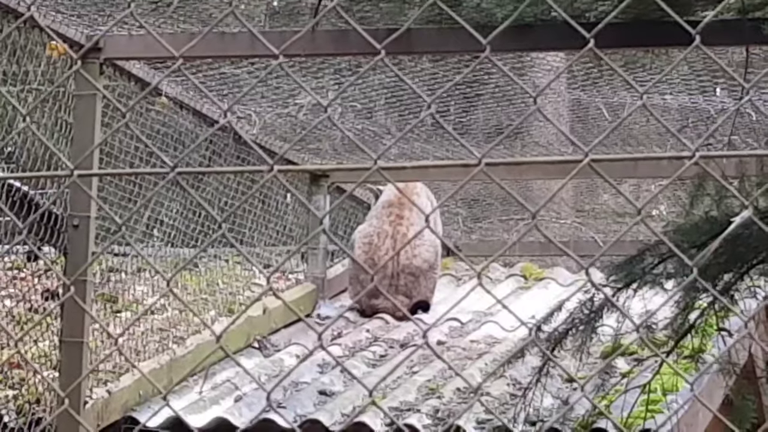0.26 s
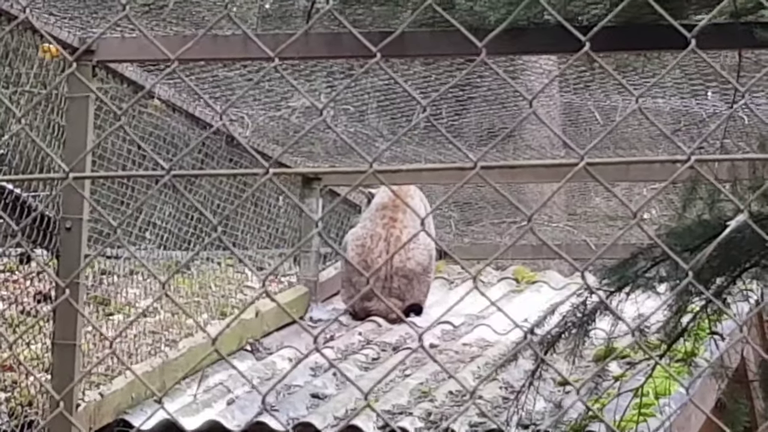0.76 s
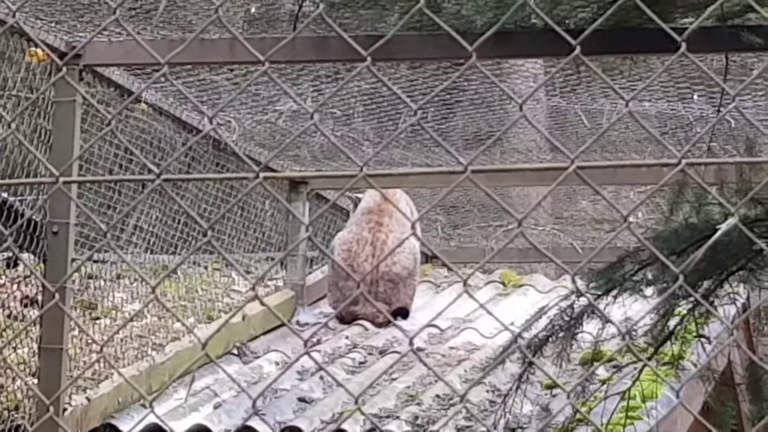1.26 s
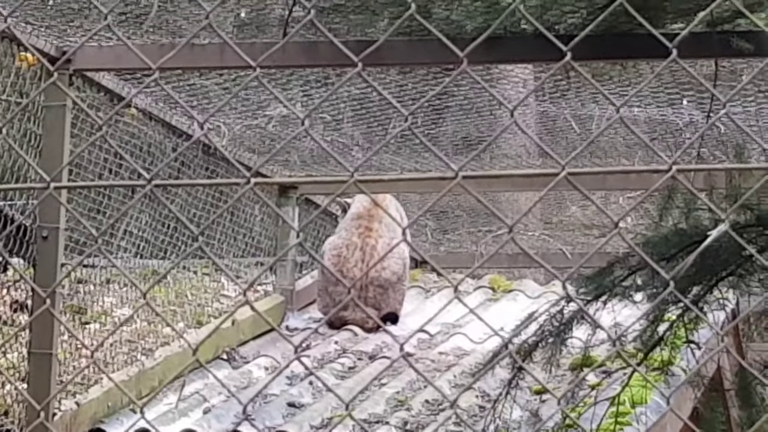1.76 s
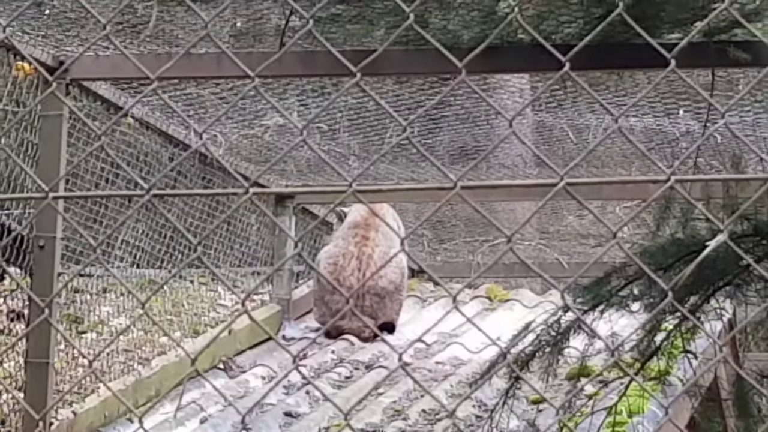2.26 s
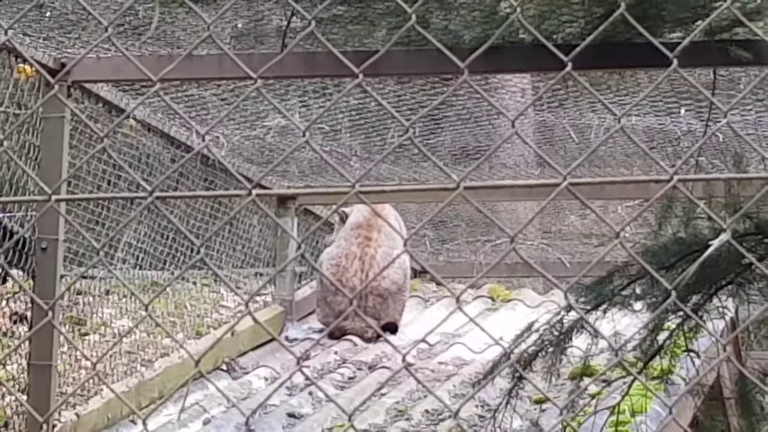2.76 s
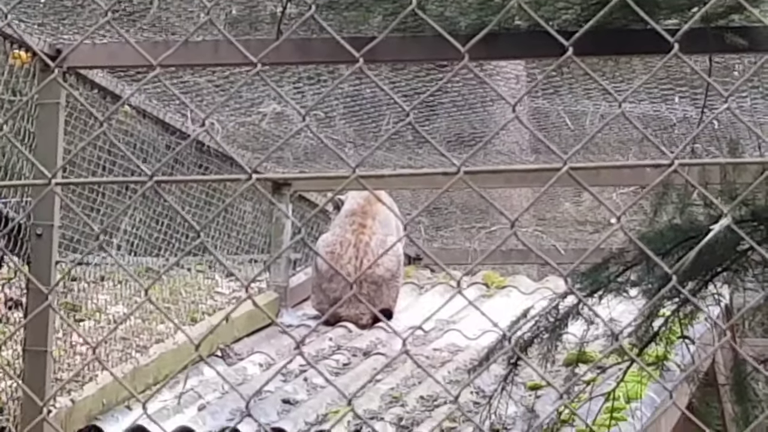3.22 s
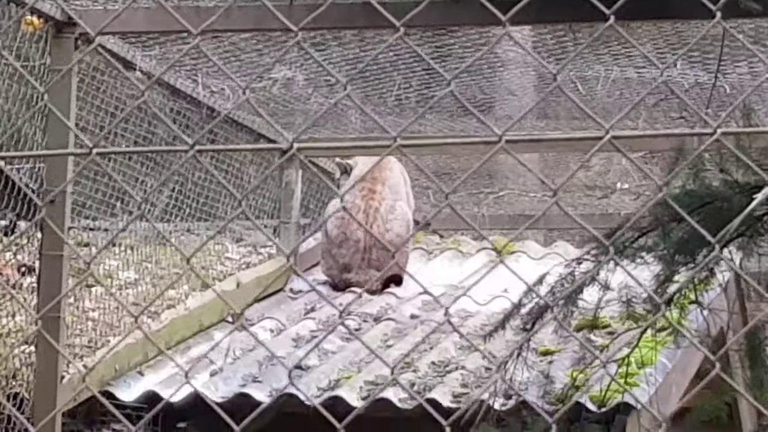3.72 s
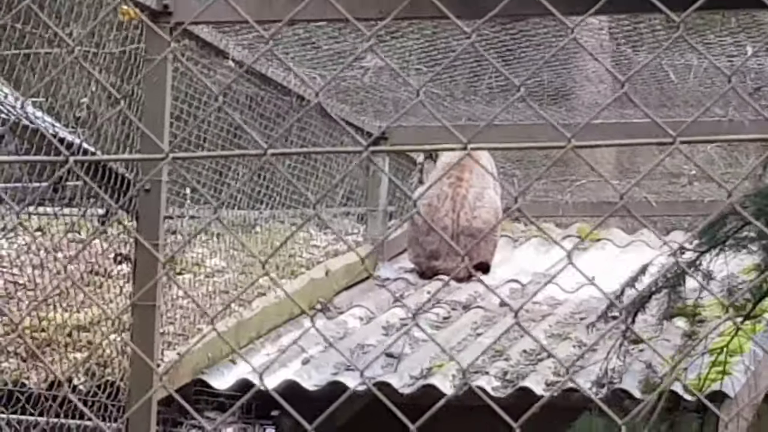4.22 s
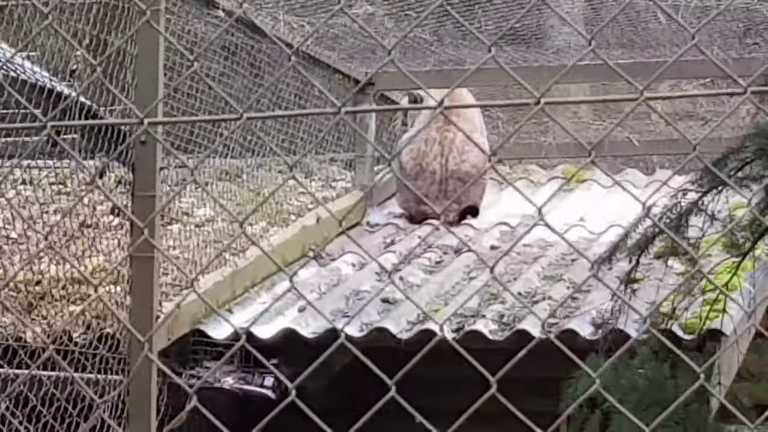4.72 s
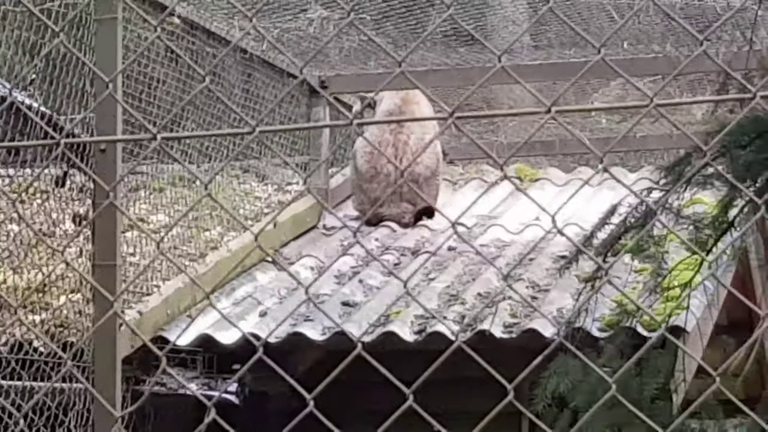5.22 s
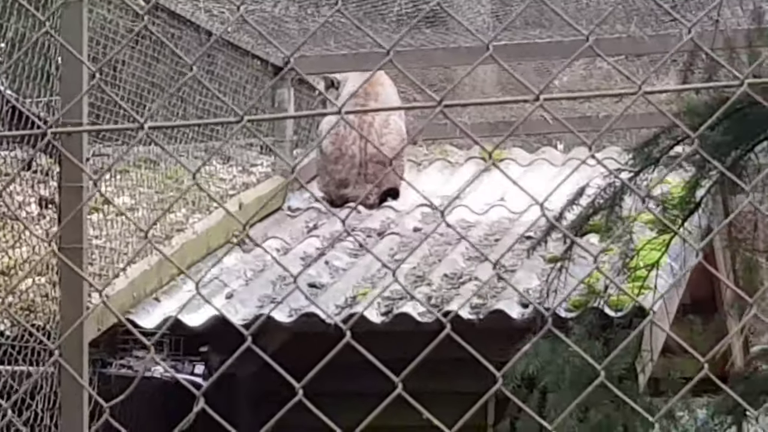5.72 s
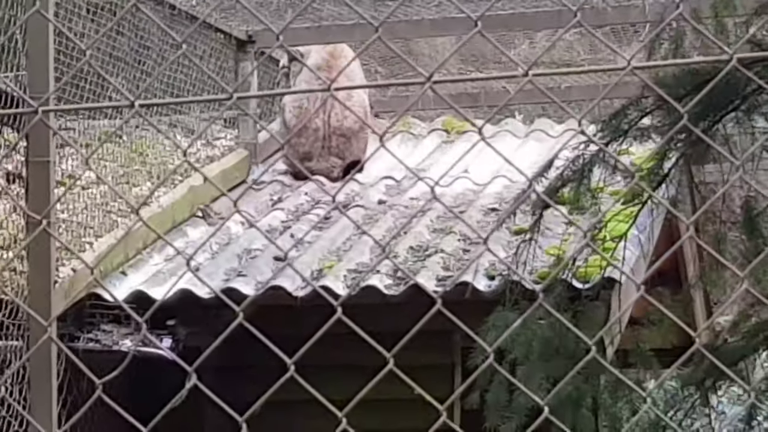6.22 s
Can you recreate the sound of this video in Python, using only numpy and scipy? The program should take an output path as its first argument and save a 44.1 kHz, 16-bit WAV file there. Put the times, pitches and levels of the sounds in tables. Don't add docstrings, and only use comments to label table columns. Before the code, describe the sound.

A quiet wooded enclosure, with low wind rumble, faint hiss and a long, soft echo. From the start a small bird whistles clear alternating notes, one rising, one dropping, until about 1.6 s. At 0.3 s a lynx yowls: a voiced, slightly nasal wail jumps up to its peak, then slides down until 1.1 s. A distant low whistle follows near 1.7-2.2 s. The second yowl runs 2.15-2.9 s, as hoarse, scolding bird notes begin, repeating about eight per second from 3.2 to 5.3 s, with faint very high whistles around 3-3.5 s. The third yowl spans 4.1-5.0 s; a second cat answers faintly, lower, at 4.6 s. Another bird chatters and whistles at 5.1-5.7 s. A soft bump at 5.2, a sharp tick at 5.7 and a duller bump at 6.0 come from the microphone. Whistles and gurgles return from 5.8 s; a fourth yowl just starts at 6.4 s and is cut off.

```python
import sys
import numpy as np
from scipy import signal
from scipy.fft import rfft, irfft, next_fast_len
from scipy.io import wavfile
from scipy.ndimage import uniform_filter1d, map_coordinates

SR = 44100
rng = np.random.default_rng(int(sys.argv[2]) if len(sys.argv) > 2 else 0)


def attenuation_scalar(level_db):
    decades = np.asarray(level_db, float) / 20
    return 10 ** decades


def master_out(mix):
    frames = np.transpose(np.atleast_2d(mix))
    ceiling = np.clip(frames, -1, 1)
    pcm = np.round(ceiling * 32767).astype(np.int16)
    wavfile.write(sys.argv[1], SR, pcm)


N = 285500
LEFT_MINUS_RIGHT = np.array([[1], [-1]])


def shape(hz, points):
    at, value = np.transpose(points)
    return np.interp(np.log(np.maximum(hz, 1)), np.log(at), value)


def walk(rate):
    k = int(SR / rate)
    held = np.repeat(rng.standard_normal(N // k + 1), k)
    return 1.225 * uniform_filter1d(uniform_filter1d(held, k), k)[:N]


def band(hz, width):
    size = next_fast_len(N, True)
    bins_hz = np.arange(1, size // 2 + 2) * SR / size
    bell = np.exp(-(np.log(bins_hz / hz) / width) ** 2)
    x = irfft(rfft(rng.standard_normal(size)) * bell, size)[:N]
    return x / x.std()


def read(rows, start=0.):
    s, *columns = np.transpose(rows)
    s = s + start
    i = np.arange(max(int(s[0] * SR), 0), min(int(s[-1] * SR), N))
    edge_s = 0.0013
    gate = np.clip((i / SR - s[0]) / edge_s, 0, 1) * np.clip((s[-1] - i / SR) / edge_s, 0, 1)
    return i, gate, [uniform_filter1d(np.interp(i / SR, s, c), size=64) for c in columns]


def swell(start, length, edge):
    i = np.arange(int(start * SR), min(int((start + length) * SR), N))
    rise = np.clip((i / SR - start) / edge, 0, 1)
    fall = np.clip((start + length - i / SR) / edge, 0, 1)
    return i, (rise * fall) ** 2


def add(out, i, hz, partials):
    phase = 2 * np.pi * (np.cumsum(hz) / SR + rng.random())
    for k, gain in partials:
        out[i] += np.sqrt(2) * gain * np.sin(k * phase)


def air():
    # frequency in Hz, level in dB per Hz.
    spectrum = [(20, -17), (65, 1), (220, -24.5), (1000, -21), (2700, -32), (5000, -32.5), (7500, -40.5),
                (16000, -37)]
    # frequency in Hz, likeness of left and right from 0 to 1.
    likeness = [(50, .995), (300, .98), (1000, .92), (4000, .82), (9000, .87), (13000, .83)]
    level_db = -56.5
    out, gust = 0, walk(1.3)
    for hz in 25 * 2 ** np.arange(0, 9.4, 1 / 3):
        like = np.clip(shape(hz, likeness), 0, 1)
        swing_db = (1.2 * gust + 2.2 * walk(6)) * min(1., 150 / hz) + .8 * walk(3)
        gain = attenuation_scalar(shape(hz, spectrum) + 10 * np.log10(hz) + swing_db)
        mid = np.sqrt(1 + like) * band(hz, 0.3)
        side = np.sqrt(1 - like) * band(hz, 0.27)
        out = out + gain * (mid + side * LEFT_MINUS_RIGHT)
    return out * attenuation_scalar(level_db) / out.std()


def handling():
    # time in seconds, peak level in dB.
    ticks = [
        (5.7219, -31.5),
    ]
    # time in seconds, peak level in dB.
    knocks = [
        (5.203, -47),
        (5.995, -41),
    ]
    # middle in seconds, half width in seconds, level in dB.
    gust_s, half_s, gust_db = (0.594, 0.064, -55.5)
    out, t = np.zeros(N), np.arange(2000) / SR
    for s, db in ticks:
        out[int(s * SR):][:len(t)] += attenuation_scalar(db) * np.exp(-t / .0003) * np.sin(2 * np.pi * 6000 * t + 1.4)
    for s, db in knocks:
        out[int(s * SR):][:len(t)] += attenuation_scalar(db) * np.exp(-t / 0.0032) * np.sin(2 * np.pi * 300 * t)
    push = np.exp(-((np.arange(N) / SR - gust_s) / half_s) ** 2)
    return out + attenuation_scalar(gust_db) * push * band(190, 0.51)


def woods(x):
    # band in Hz, near scatter in dB, its T60 in seconds, far tail in dB, its T60 in seconds.
    scatter = [(274, -38, 0.082, -32.5, 0.32), (700, -25, 0.33, -29.5, 1.4), (1210, -22.5, 0.15, -42, 5.7),
               (2785, -8.5, 0.62, -16, 2.25), (4640, -11.5, 0.59, -26, 0.59), (6130, -4, 0.064, -5.5, 2.6)]
    sway_s, echo_width = .0004, 0.29
    t, out = np.arange(N) / SR, []
    x = map_coordinates(x, [(t + sway_s * walk(12)) * SR], order=3)
    for _ in range(2):
        tail = 0
        for hz, near_db, near_t60, far_db, far_t60 in scatter:
            for db, t60, rise_s in ((near_db, near_t60, .04), (far_db, far_t60, .1)):
                decay = (1 - np.exp(-(t / rise_s) ** 2)) * attenuation_scalar(-60 * t / t60)
                tail = tail + attenuation_scalar(db) * band(hz, .6) * decay / np.sqrt(np.sum(decay ** 2))
        out.append(signal.fftconvolve(x, tail[:3 * SR])[:N])
    return out[0] + echo_width * out[1] * LEFT_MINUS_RIGHT


def leaves(x):
    level_db, t60_s, width = -6, .08, .6
    decay = attenuation_scalar(-60 * np.arange(SR // 4) / SR / t60_s)
    spray = rng.standard_normal((2, len(decay))) * decay / np.sqrt(np.sum(decay ** 2))
    mid, side = (signal.fftconvolve(x, s)[:N] for s in spray)
    return attenuation_scalar(level_db) * (mid + width * side * LEFT_MINUS_RIGHT)


def gurgler():
    # start in seconds, length in seconds, level in dB, centre in Hz.
    gurgles = [
        (1.81, .06, -71, 2620),
        (1.95, .07, -65, 2360),
        (3.18, .17, -63, 2560),
        (5.87, .06, -69, 3100),
        (5.98, .25, -60, 2600),
        (6.27, .09, -60, 2700),
        (6.4, .09, -56, 2850),
    ]
    out, grain = np.zeros(N), attenuation_scalar(4.5 * walk(70))
    wobble = 1 + .08 * walk(200) + .04 * walk(25)
    for s, length, db, hz in gurgles:
        i, gain = swell(s, length, .025)
        add(out, i, hz * wobble[i], [(0.98, gain * grain[i] * attenuation_scalar(db - 0.5))])
    return out * (1 + 1.13 * band(250, 1.0))


def whistlers():
    # seconds after onset, pitch in Hz, level in dB.
    rise = [(0, 3730, -25), (.012, 3760, -5), (.05, 3930, -1), (.085, 3990, 0), (.11, 3990, -2),
            (.122, 3960, -30)]
    drop = [(0, 5600, -22), (.005, 4800, -8), (.014, 4380, -3), (.035, 4260, -2), (.06, 4235, 0),
            (.095, 4235, -2), (.11, 4235, -30)]
    slide = [(0, 5150, -16), (.012, 5150, -5), (.028, 4970, -3), (.08, 5430, 0), (.13, 5610, 0),
             (.2, 5650, -5), (.24, 5620, -25)]
    # onset in seconds, level in dB.
    rises = [(0.037, -50), (0.472, -48.5), (0.917, -48.5), (1.389, -47.5), (5.799, -51), (6.198, -46)]
    drops = [(-.04, -68), (0.175, -51), (0.61, -50.5), (1.065, -53.5), (1.532, -53.5)]
    slides = [(.43, -64), (.95, -62), (1.485, -64), (2.03, -63), (5.81, -70), (6.35, -68)]
    late_drops = [
        (5.933, -52),
        (6.335, -53),
    ]
    far_rises = [
        (5.4, -59),
    ]
    far_drops = [
        (5.535, -58),
    ]
    # start in seconds, length in seconds, first, middle and last pitch in Hz.
    far_call = [
        (1.705, .17, 1460, 1620, 1660),
        (1.89, .3, 1440, 1335, 1310),
    ]
    thin_song = [
        (2.945, .21, 11700, 11130, 10000),
        (3.17, 0.094, 9900, 10060, 9350),
        (3.414, 0.11, 9370, 9860, 9300),
    ]
    far_call_db = (-54, -58)
    thin_song_db = (-68.5, -71, -76)
    late_sharp, far_sharp = 1.013, 1.03
    out, flutter = np.zeros(N), attenuation_scalar(3.04 * walk(50))
    songs = ((rise, rises, 1), (drop, drops, 1), (drop, late_drops, late_sharp), (slide, slides, 1),
             (rise, far_rises, far_sharp), (drop, far_drops, far_sharp))
    for note, events, sharp in songs:
        for s, level_db in events:
            i, gate, (hz, db) = read(note, s)
            add(out, i, hz * sharp, [(1, gate * attenuation_scalar(db + level_db))])
    tones = [*far_call, *thin_song]
    for (s, length, *path), db in zip(tones, [*far_call_db, *thin_song_db]):
        i, gain = swell(s, length, .03)
        hz = np.interp(i / SR - s, (0, length / 2, length), path)
        hz = uniform_filter1d(hz, size=900, mode="nearest")
        add(out, i, hz, [(0.99, gain * attenuation_scalar(db))])
    return out * flutter


def chatterer():
    # seconds after onset, share of the top pitch, level in dB.
    slip = [(-.033, 1.15, -25), (-.03, 1.1, -9), (-.021, .92, -10), (-.018, .88, -30)]
    arch = [(-.003, .6, -22), (.001, .72, -4), (.006, .92, -1), (.012, 1.0, -1), (.018, .95, 0),
            (.025, .83, 1), (.033, .7, -1), (.04, .6, -22)]
    # onset in seconds, level in dB, top pitch in Hz.
    scolds = [(2.123, -58, 2490), (2.408, -53, 2036), (2.538, -51, 2240), (2.662, -48.5, 2350),
              (2.786, -51.5, 2150), (2.918, -56, 2174), (3.233, -54.5, 2403), (3.362, -55, 2174),
              (3.486, -50.5, 2310), (3.612, -53, 2243), (3.736, -53, 2105), (3.859, -51.5, 2250),
              (3.979, -52, 2262), (4.102, -54, 2274), (4.232, -54.5, 2145), (4.357, -51.5, 2130),
              (4.502, -51.5, 2174), (4.616, -49, 2255), (4.735, -47.5, 2090), (4.86, -50.5, 2246),
              (4.985, -52.5, 2203), (5.13, -55.5, 2075), (5.248, -56, 2122), (6.321, -54.5, 2296),
              (6.435, -54, 2230)]
    # start in seconds, gap in seconds, level in dB, change of level in dB
    bouts = [
        (4.307, .1095, -56.5, 3),
        (5.092, .1174, -56.5, -0.25),
    ]
    bout_top_hz, bout_stretch, bout_first_db = 2270, .72, 1
    first_db, third_db, note_scatter_db = -4, -6, 1.6
    slip_ends_s, rasp_db = 4.2, -9
    out, rasp = np.zeros(N), band(3000, .75)
    fade = [attenuation_scalar(3.0 * walk(70)) for _ in range(3)]
    notes = [(*row, 1, first_db) for row in scolds]
    for (s, gap, db, step_db), count in zip(bouts, (3, 6)):
        for k in range(count):
            notes.append((s + k * gap, db + k * step_db, bout_top_hz, bout_stretch, bout_first_db))
    scatter_db = note_scatter_db * rng.standard_normal((40, 2))
    for (s, level_db, top_hz, stretch, low_db), (a, b) in zip(notes, scatter_db):
        for note in (slip, arch) if s < slip_ends_s else (arch,):
            i, gate, (share, db) = read(np.array(note) * [stretch, 1, 1], s)
            hz, gain = share * top_hz, gate * attenuation_scalar(db + level_db)
            out[i] += gain * rasp[i] * attenuation_scalar(rasp_db)
            partials = []
            for k, partial_db in enumerate((low_db + a, 0, third_db + b)):
                partial_hz = (k + 1) * hz
                beak = 1 / (1 + (1900 / partial_hz) ** 8 + (partial_hz / 6900) ** 24)
                partials.append((k + 1, gain * fade[k][i] * attenuation_scalar(partial_db) * beak))
            add(out, i, hz, partials)
    return out * (1 + .22 * band(350, .8))


def cats():
    # time in seconds, pitch in Hz, level in dB, mouth opening as tilt in 6 dB per octave.
    yowls = [
        [(.295, 321.5, -68, -2.5), (.33, 396.6, -42, -2.5), (.4, 567, -38.5, -1.5), (.46, 665.8, -31, -0.5),
         (.615, 659.7, -32.5, 0), (.72, 573.3, -35, 0), (.85, 479.6, -35.5, -0.22), (1.03, 388.3, -47.5, 0.4),
         (1.07, 317.7, -65, -1)],
        [(2.15, 324, -63, 1.5), (2.19, 452, -42, -2.5), (2.26, 625, -36, -1.5), (2.31, 665.6, -32.5, -0.5),
         (2.43, 651.8, -32, 0), (2.52, 613, -34, 0), (2.67, 496.2, -36, 0), (2.81, 412.5, -43.5, 0.5),
         (2.88, 314, -47.5, -1)],
        [(4.13, 294, -52, -4.5), (4.18, 391.3, -44.5, -1), (4.27, 607, -37, -0.5), (4.32, 643, -34.5, -0.5),
         (4.4, 648, -30.5, -0.5), (4.55, 565.4, -32, 0.5), (4.69, 477.4, -32, 0), (4.93, 394.6, -42, 1),
         (4.985, 334.6, -53, 0.5)],
        [(6.425, 310, -49, 0), (6.445, 338, -53.5, -2.5), (6.48, 403, -49, -2)],
    ]
    # frequency in Hz, gain in dB.
    throat = [(320, -20), (450, -10), (660, -8), (800, -2), (1000, -1.5), (1320, -4.5), (1700, -9.5),
              (2650, -17)]
    # frequency in Hz, gain in dB.
    upper = [(1500, -36), (2600, -35), (3300, -33), (4000, -43), (5000, -52), (5900, -43), (6600, -56),
             (9000, -70)]
    # time in seconds, pitch in Hz, level in dB.
    answer = [(4.555, 404, -76), (4.58, 454, -47), (4.63, 481, -46), (4.7, 440, -45), (4.82, 350, -49),
              (4.9, 320, -53), (4.93, 316.8, -59.5)]
    answer_partials_db = (-1, -2.5, -14)
    upper_fade_db = 30
    rasp_db = -25
    out, tremble, rasp = np.zeros(N), 1 + .002 * walk(60), band(1300, .75)
    waver = [attenuation_scalar(2.4 * walk(20)) for _ in range(14)]
    for rows in yowls:
        i, gate, (hz, loud_db, mouth) = read(rows)
        hz = uniform_filter1d(hz, size=1500, mode="nearest")
        out[i] += gate * rasp[i] * attenuation_scalar(loud_db + rasp_db)
        effort_db = loud_db + upper_fade_db * np.log2(hz / 660)
        partials = []
        for k in range(1, 15):
            if k < 5:
                db = loud_db + shape(k * hz, throat) + 6 * mouth * np.log2(max(k, 2) / 2)
            else:
                db = effort_db + shape(k * hz, upper)
            partials.append((k, gate * waver[k - 1][i] * attenuation_scalar(db)))
        add(out, i, hz * tremble[i], partials)
    i, gate, (hz, db) = read(answer)
    add(out, i, hz, [(k + 1, gate * attenuation_scalar(db + d)) for k, d in enumerate(answer_partials_db)])
    return out


def scene():
    cat, whistle, chatter, gurgle = cats(), whistlers(), chatterer(), gurgler()
    echo = woods(cat + attenuation_scalar(-6) * whistle + attenuation_scalar(-5) * chatter + attenuation_scalar(-2.7) * gurgle)
    birds = whistle * attenuation_scalar([[-.8], [.8]]) + (chatter + gurgle) * attenuation_scalar([[-.3], [.3]])
    near = cat * attenuation_scalar([[.15], [-.15]]) + birds + leaves(.5 * whistle + chatter + gurgle)
    return near + echo + handling() + air()


def band_limit(x):
    return signal.sosfilt(signal.butter(12, 16410, fs=SR, output="sos"), x)


def record(dry):
    steep = signal.ellip(10, .2, 80, 15740, fs=SR, output="sos")
    return band_limit(signal.sosfilt(steep, dry))


dry = scene()
out = record(dry)
master_out(out)
```